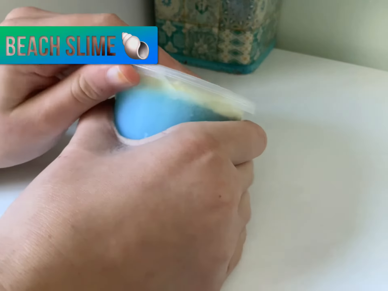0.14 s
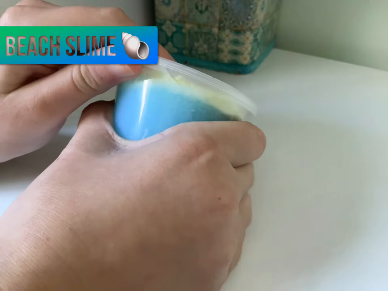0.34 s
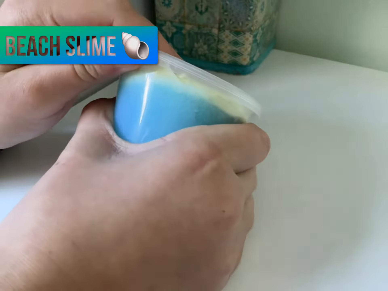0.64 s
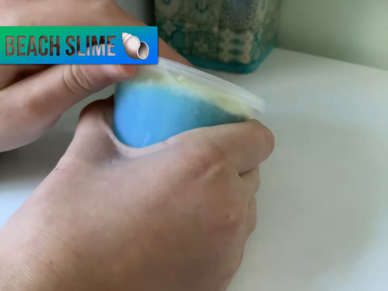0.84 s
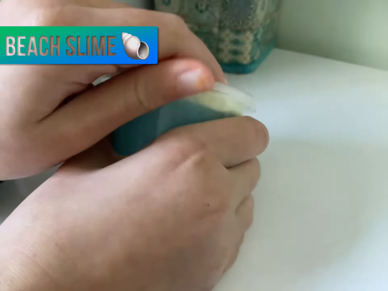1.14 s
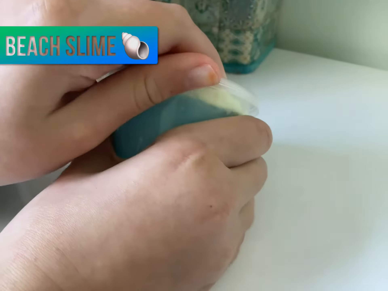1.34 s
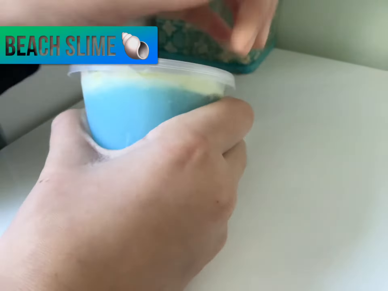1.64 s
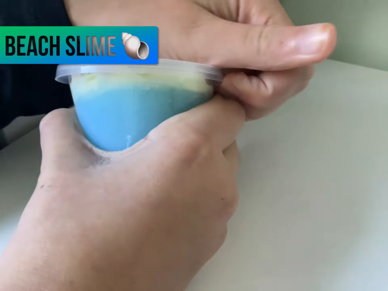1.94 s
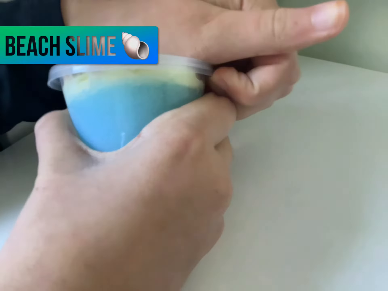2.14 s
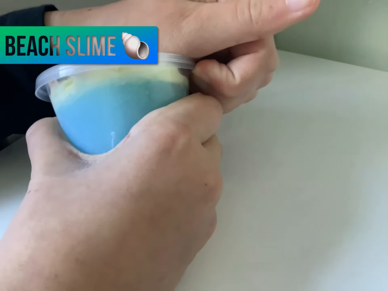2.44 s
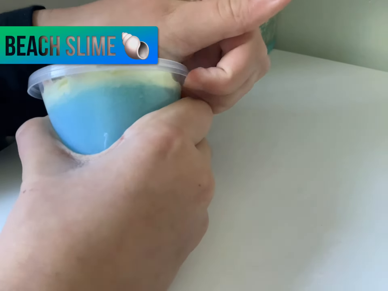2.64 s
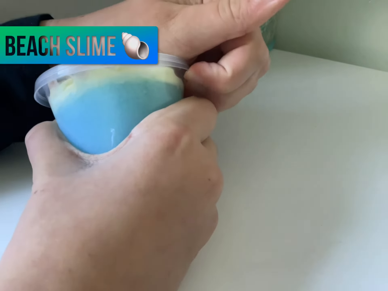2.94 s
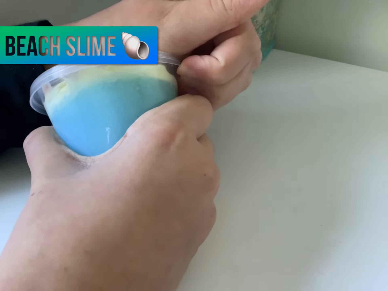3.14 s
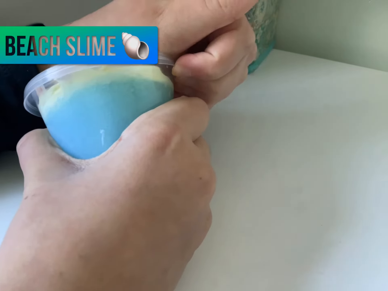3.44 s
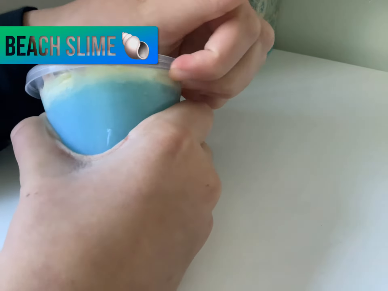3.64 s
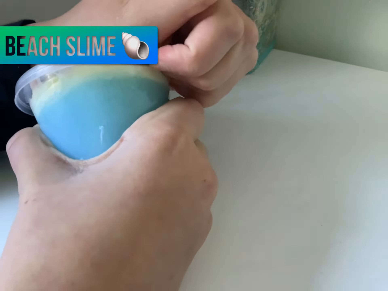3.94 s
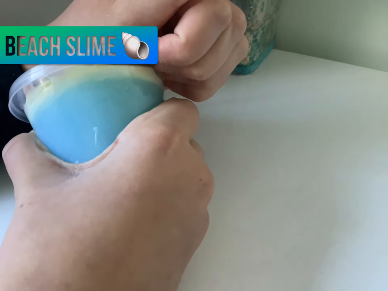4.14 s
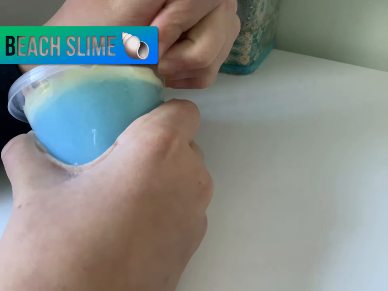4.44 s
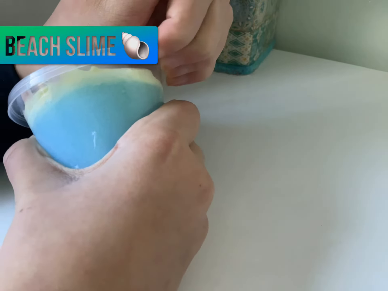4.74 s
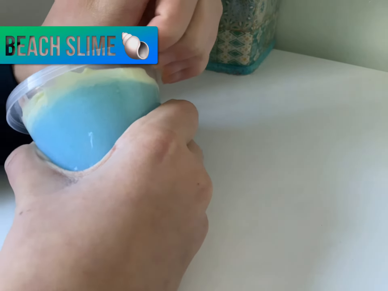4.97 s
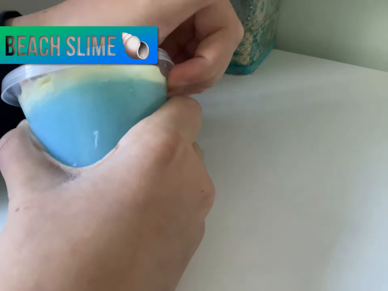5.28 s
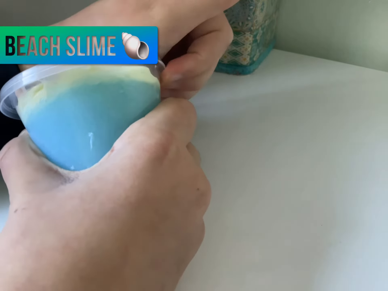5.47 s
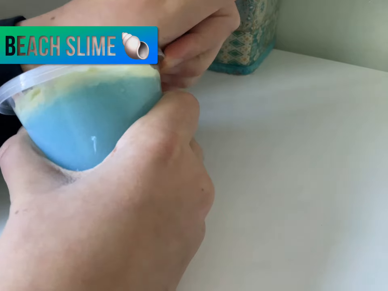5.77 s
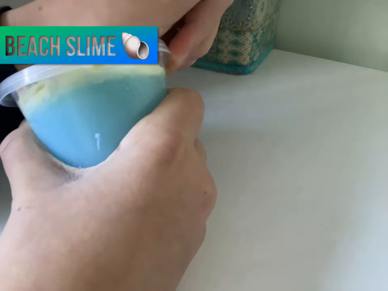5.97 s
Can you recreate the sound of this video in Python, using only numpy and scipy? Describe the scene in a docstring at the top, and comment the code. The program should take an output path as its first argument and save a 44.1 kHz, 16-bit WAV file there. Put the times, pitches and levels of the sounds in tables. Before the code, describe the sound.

Sharp plastic snaps and fine ratcheting ticks as fingers pry a thin lid off a small tub, one hollow pop as the seal gives.

```python
"""Prying a thin plastic lid off a tub of slime

Fingers pry the lid close to the microphone in a quiet room. The rim sticks and slips over the tub's lip
in runs of ticks and snaps free piece by piece: impulses that ring the tub's modes and a diffuse room.
The seal lets go with one pop, a damped swing of air whose pitch falls. Fingertips tap the lid as softer
impulses and rub it as grainy filtered noise; wavering sines and coloured noise make a low hum and hiss."""
import sys
import numpy as np
from scipy import signal
from scipy.fft import rfft, irfft, next_fast_len
from scipy.io import wavfile
from scipy.ndimage import uniform_filter1d, map_coordinates

SR = 44100
rng = np.random.default_rng(int(sys.argv[2]) if len(sys.argv) > 2 else 0)


def to_wav(s):
    """Save 16-bit WAV."""
    ch = np.atleast_2d(s).T  # columns
    pcm = np.round(np.clip(ch, -1, 1) * 32767)  # PCM
    wavfile.write(sys.argv[1], SR, pcm.astype(np.int16))


N = 269451
AJAR_S = 4.5  # from this time the lid counts as lifted at one side


def amp(db):
    """Decibel law: the amplitude ratio of a level."""
    return 10 ** (np.asarray(db) / 20)


def unit(x):
    """Normalisation to an rms of 1."""
    return x / np.sqrt(np.mean(x ** 2) + 1e-20)


def along(points, hz):
    """Interpolation of (frequency [Hz], value) points on a logarithmic frequency axis."""
    point_hz, values = np.transpose(points)
    return np.interp(np.log(hz + 1), np.log(point_hz), values)


def clock(size):
    """Uniform sampling: the times [s] of size samples."""
    return np.arange(size) / SR


def wobble(rate):
    """Band-limited fluctuation: a smooth curve through random knots, rate of them a second."""
    knots = rng.standard_normal(int(N * rate / SR) + 4)
    return map_coordinates(knots, [clock(N) * rate])


def filtered(x, response):
    """Linear filtering: the spectrum of x times a complex response of frequency."""
    size = next_fast_len(2 * len(x))
    hz = np.fft.rfftfreq(size, 1 / SR)
    return irfft(rfft(x, size) * response(hz), size)[:len(x)]


def noise(spectrum):
    """Spectral shaping: white noise coloured by a spectrum, with an rms of 1."""
    return unit(filtered(rng.standard_normal(N), lambda hz: amp(along(spectrum, hz))))


def add(track, s, sound):
    """Superposition: mix a sound into the track at s seconds."""
    part = track[round(s * SR):][:len(sound)]
    part += sound[:len(part)]


# spectrum of the room air: (frequency [Hz], relative density [dB per Hz])
AIR_SPECTRUM = [(25, -40), (42, -10.5), (90, -4.5), (150, -17), (373, -17.5), (610, -23.5), (1070, -25.5),
                (4400, -26.5), (6500, -30), (8800, -34), (11500, -26), (15700, -26.5), (16300, -52.5)]
# partials of the low hum: (frequency [Hz], mean rms level [dB])
HUM_PARTIALS = [(91.5, -72), (183.5, -79.5), (370, -82)]


def background():
    """Stationary noise and slow modulation: room air, and a low hum that wavers in pitch and level."""
    phase = 2 * np.pi * (clock(N) + 0.0021 * wobble(3.8))
    hum = np.zeros(N)
    for hz, db in HUM_PARTIALS:
        hum += amp(db + 1.2 * wobble(17)) * np.sqrt(2) * np.sin(hz * phase)
    air_db = -64.8 + 0.8 * wobble(0.7)
    return hum + amp(air_db) * noise(AIR_SPECTRUM)


def resonance(hz, centre_hz, width_hz):
    """Damped oscillator: the response of one mode, of gain 1 at its centre."""
    return 1j * hz * width_hz / (centre_hz ** 2 - hz ** 2 + 1j * hz * width_hz)


# each table of modes: (centre [Hz], width [Hz], gain [dB]); each push detunes the centres slightly
# the plastic
PLASTIC_MODES = [(1034, 100, 1.5), (1410, 280, -2), (1763, 110, 1), (2197, 166, -2), (2580, 140, -2.5),
                 (3180, 600, -5), (4446, 850, -2), (5774, 786, 3.5), (7100, 1200, 0.5), (9220, 1400, -11),
                 (10770, 1570, 2.5), (11800, 3740, 0.5), (14840, 1950, -3.5)]
# the air in the tub under the closed lid
CLOSED_MODES = [(248, 820, -6.5), (501, 139, 5)]
# the air in the tub and the loose flap of rim, once the lid has lifted at one side
AJAR_MODES = [(403, 280, -5), (685, 75, 10), (3510, 260, -1), (4670, 480, 6)]


def tub(hz, s):
    """Modal superposition: the tub's response to a push at s seconds; the grip retunes it each time."""
    modes = (AJAR_MODES if s > AJAR_S else CLOSED_MODES) + PLASTIC_MODES
    bend = np.exp(0.027 * rng.standard_normal(len(modes)))
    response = 0
    for k, (centre_hz, width_hz, db) in enumerate(modes):
        sign = (-1) ** k  # successive modes in the tables alternate in sign
        response = response + sign * amp(db) * resonance(hz, centre_hz * bend[k], width_hz)
    return response


# decay of the room: (frequency [Hz], time to fall by 60 dB [s])
ROOM_DECAY = [(200, 0.388), (1500, 0.33), (3300, 0.35), (4700, 0.3), (7500, 0.43), (11000, 0.36),
              (16000, 0.24)]
# colour of the room's answer: (frequency [Hz], relative level [dB])
ROOM_TINT = [(150, 9.5), (600, 0.5), (2000, 2), (4500, 0.5), (8000, -4), (11500, -4.5), (15600, -4.5),
             (16400, -24.5)]


def in_room(sound, room_db, size=512):
    """Diffuse reverberation: the walls gather all directions, so only the sound's broad colour survives."""
    hz, t, grains = signal.stft(rng.standard_normal(SR // 2), SR, nperseg=size)
    power = np.sum(np.abs(signal.stft(sound, nperseg=size)[2]) ** 2, axis=1)
    colour = np.sqrt(np.abs(uniform_filter1d(power, size=3)))
    fade = amp(along(ROOM_TINT, hz)[:, None] - 60 * t / along(ROOM_DECAY, hz)[:, None])
    tail = signal.istft(grains * colour[:, None] * fade, SR, nperseg=size)[1]
    tail = tail * (1 - np.exp(-(clock(len(tail)) / 0.00073) ** 2))  # the walls take a moment to answer
    tail = filtered(tail, lambda f: f ** 2 / (f ** 2 + 170 ** 2))  # so small a source sends out little bass
    # room_db is the energy of the answer against the direct sound
    heard = amp(room_db) * np.linalg.norm(sound) * tail / np.linalg.norm(tail)
    add(heard, 0, sound)
    return heard


# bands of the air in the tub, the flexing lid, the stiff rim and its thin edge: (from [Hz], to [Hz])
PART_BANDS = [(100, 780), (780, 3800), (3800, 8800), (8800, 16500)]


def click(s, levels_db, spot_hz, spot_db, crackle_db, crackle_t60, table_db):
    """Impulse excitation: a sudden release and its micro-slips ring each part of the tub at its own level."""
    t = clock(size=2048)
    crackle = rng.standard_normal(len(t)) * rng.exponential(size=len(t)) * amp(-60 * t / crackle_t60)
    force = amp(crackle_db) * crackle / np.linalg.norm(crackle)
    force[0] += 1
    # the table top throws the click back, scattered by the hands
    late = t - 0.0022
    bounce = rng.standard_normal(len(t)) * (late > 0) * amp(-60 * np.abs(late) / 0.0036)
    force += amp(table_db) * bounce / np.linalg.norm(bounce)

    def response(hz):
        """Local resonance: the spot that is bent or touched favours one frequency."""
        return tub(hz, s) * (1 + amp(spot_db) * resonance(hz, spot_hz, 0.25 * spot_hz))

    ring = filtered(force, response)
    total = np.zeros(len(t))
    for db, band in zip(levels_db, PART_BANDS):
        part = signal.sosfilt(signal.butter(3, band, "bandpass", fs=SR, output="sos"), ring)
        total += amp(db) * part / np.linalg.norm(part)
    return np.sqrt(0.007 * SR) * total  # each level is an rms taken over 7 ms


def arch(values, count):
    """Quadratic interpolation: count steps along an arch through a first, a middle and a last value."""
    return np.polyval(np.polyfit([-1, 0, 1], values, 2), np.linspace(-1, 1, count))


# stick-slip runs of the rim along the lip: (time [s], ticks [count], (first, middle, last gap [s]),
# (first, middle, last rim level [dB]), edge against rim in the first tick [dB])
STICK_SLIP_RUNS = [(3.4604, 6, (0.009, 0.0124, 0.0143), (-43, -36.5, -27), -3),
                   (3.8814, 3, (0.013, 0.0129, 0.0129), (-36, -34.5, -39), -2.5),
                   (3.916, 5, (0.0082, 0.0094, 0.0145), (-36.5, -33.5, -49), 5)]
RUN_BRIGHTENS_DB = 4.5  # the edge gains this much against the rim from the first tick to the last


def run_ticks():
    """Stick-slip friction: (time, level, brightness) of ticks whose pace and force change smoothly."""
    ticks = []
    for s, count, gaps, levels_db, bright_db in STICK_SLIP_RUNS:
        steps = np.exp(arch(np.log(gaps), count - 1))
        times = s + np.cumsum([0, *steps])
        brightness_db = bright_db + np.linspace(0, RUN_BRIGHTENS_DB, count)
        ticks += zip(times, arch(levels_db, count), brightness_db)
    return ticks


# further single slips outside the smooth runs:
# (time [s], rim level [dB], brightness: edge against rim [dB])
SINGLE_SLIPS = [(0.1485, -60, 0.5), (0.2462, -60, 5.5), (1.137, -53, -2), (2.0958, -48, -3),
                (2.1085, -46.5, -7), (2.5497, -43.5, -15), (2.5629, -36.5, 0.5), (2.732, -45.5, 0.5),
                (3.7589, -55, 1), (3.8479, -44, 2.5), (3.9784, -41.5, 9), (5.302, -43.5, -4.5)]
SLIP_TUB_DB, SLIP_LID_DB = -16.5, -6  # air in the tub and lid, against the rim


def slips():
    """Sudden release of friction: each slip is a clean, dry tick that hardly moves the air in the tub."""
    track = np.zeros(N)
    for s, db, bright_db in SINGLE_SLIPS + run_ticks():
        levels_db = db + np.array([SLIP_TUB_DB, SLIP_LID_DB, 0, bright_db])
        tick = click(s, levels_db, spot_hz=1730, spot_db=-13.5,
                     crackle_db=-11.5, crackle_t60=0.006, table_db=-11.5)
        add(track, s, in_room(tick, room_db=-16.5))
    return track


def gulp(db, start_hz, end_hz, glide, attack, t60):
    """Damped air oscillation: a swing whose pitch falls from start_hz towards end_hz."""
    t = clock(size=8192)
    hz = end_hz + (start_hz - end_hz) * np.exp(-t / glide)
    envelope = amp(db - 60 * t / t60) * (1 - np.exp(-t / attack))
    return envelope * np.sin(2 * np.pi * np.cumsum(hz) / SR)


# the rim snaps over the lip: (time [s], edge level [dB], thinness: lid below edge [dB],
# level of the air in the tub [dB], room answer against the direct sound [dB], ring of the bent spot [Hz])
RIM_SNAPS = [(0.4564, -20, 29.5, -55.5, -12.5, 1230), (0.5243, -22, 40, -63, -35, 2560),
             (0.562, -19, 23, -42.5, -14.5, 1100), (0.825, -26, 30.5, -55.5, -19.5, 2400),
             (0.902, -16.5, 22.5, -47.5, -10.5, 2700), (2.5815, -19.5, 11, -40.5, -18, 2400),
             (3.16, -16, 12.5, -31, -16, 2230), (3.5539, -22, -0.5, -38.5, -16, 1555),
             (3.9863, -13.5, 19.5, -37.5, -23, 4640), (3.9888, -27.5, 11, -46, -28, 2200),
             (4.359, -18.5, 7, -33, -13, 1020), (4.4163, -31, 5, -42, -15.5, 2060),
             (5.3635, -19, 11, -32.5, -14.5, 1240)]
SNAP_RIM_SHARE = 0.5  # a thin snap frees only the edge: the rim loses this share of the thinness
PUFF_DB = -16.5  # start level of the puff before its attack and decay, against the air in the tub


def snaps():
    """Release of elastic energy: bursts of tiny releases fill the room; the jolted tub gives a small puff."""
    track = np.zeros(N)
    for s, db, thin_db, tub_db, room_db, spot_hz in RIM_SNAPS:
        levels_db = [tub_db, db - thin_db, db - SNAP_RIM_SHARE * thin_db, db]
        snap = click(s, levels_db, spot_hz, spot_db=4.5, crackle_db=-1.0, crackle_t60=0.016, table_db=-4.5)
        puff = gulp(db=tub_db + PUFF_DB, start_hz=330, end_hz=60, glide=0.01, attack=0.002, t60=0.053)
        add(track, s, in_room(snap, room_db))
        add(track, s, puff)
    return track


# skin rubs over the plastic, levels before the trims in rubs():
# (start of full contact [s], length of full contact [s], body level [dB], hiss level [dB])
SKIN_RUBS = [(1.403, 0.33, -71.5, -58), (1.772, 0.42, -63, -59), (2.516, 0.02, -60, -52.5),
             (3.053, 0.1, -63, -66), (5.143, 0.082, -61.5, -58), (5.231, 0.045, -61.5, -48),
             (5.941, 0.075, -61, -48.5)]
# spectra of the murmur and of the hiss: (frequency [Hz], relative density [dB per Hz])
MURMUR_SPECTRUM = [(140, 1), (300, 15), (500, 11), (1100, 3.5), (1900, 10.5), (3000, -1), (5000, 7.5),
                   (8500, -10), (12000, -25)]
HISS_SPECTRUM = [(5000, -22.5), (9000, -12.5), (11500, -3.5), (13500, -4), (15600, -5), (16200, -15.5)]
RUB_ATTACK_S, RUB_RELEASE_S = 0.079, 0.034


def rubs():
    """Sliding friction: skin drags in small catches, a grainy murmur of the lid under a fine hiss."""
    t, body, hiss = clock(N), np.zeros(N), np.zeros(N)
    for s, length, body_db, hiss_db in SKIN_RUBS:
        corners = [s - RUB_ATTACK_S, s, s + length, s + length + RUB_RELEASE_S]
        contact = np.interp(t, corners, [0, 1, 1, 0])
        body += contact * amp(body_db)
        hiss += contact * amp(hiss_db)
    # about 70 catches a second, each dying away over a steady drag
    catches = (rng.random(N) < 70 / SR) * rng.uniform(0.21, 1, N)
    grip = unit(0.83 + signal.fftconvolve(catches, amp(-60 * clock(size=1024) / 0.017))[:N])
    murmur = amp(-3.5) * body * grip * noise(MURMUR_SPECTRUM)
    return murmur + amp(-10.5) * hiss * noise(HISS_SPECTRUM)


# fingers feel for the loosened rim: (from [s], to [s])
FUMBLE_SPANS = [(5.099, 5.18), (5.58, 5.62), (5.9, 6.02)]
TOUCHES_PER_S, TOUCH_DB, TOUCH_SPREAD_DB, TOUCH_HARDNESS_DB = 40, -60, 3.5, -26


def touches():
    """Jittered point process: (time, level, hardness) of faint touches loosely spaced in each fumble."""
    spans = [np.arange(start, end, 1 / TOUCHES_PER_S) for start, end in FUMBLE_SPANS]
    found = []
    for s in np.concatenate(spans):
        late, force = rng.uniform(-1, 1, 2)
        time = s + 0.5 * late / TOUCHES_PER_S
        found.append((time, TOUCH_DB + TOUCH_SPREAD_DB * force, TOUCH_HARDNESS_DB))
    return found


# fingertips and nails touch the lid: (time [s], lid level [dB], hardness: edge against lid [dB])
FINGER_TAPS = [(1.513, -49.5, -2), (1.5196, -52, -0.5), (1.526, -53.5, -5), (1.8757, -35.5, -11.5),
               (2.1563, -58, -6), (2.2045, -55.5, -15), (2.5193, -45.5, -20), (5.1834, -45, -6),
               (5.1925, -35.5, -4.5), (5.631, -48, -11), (5.6604, -55, -10), (5.6854, -51.5, -12),
               (5.9279, -49.5, -1.5), (5.9671, -46.5, -4), (6.0447, -56, -22)]
TAP_TUB_DB, TAP_RIM_DB = -8, -3  # against the lid
TAP_RIM_SHARE = 0.41  # the rim takes this share of the hardness
TAUT_LID_HZ, LOOSE_LID_HZ = 2100, 1128  # what a touch rings while the lid is closed, and once it is ajar


def taps():
    """Contact stiffness: soft fingers knock the middle of the lid; a nail also reaches the rim and edge."""
    track = np.zeros(N)
    for s, db, hard_db in FINGER_TAPS + touches():
        levels_db = db + np.array([TAP_TUB_DB, 0, TAP_RIM_DB + TAP_RIM_SHARE * hard_db, hard_db])
        spot_hz = LOOSE_LID_HZ if s > AJAR_S else TAUT_LID_HZ
        knock = click(s, levels_db, spot_hz, spot_db=8, crackle_db=6, crackle_t60=0.0027, table_db=-1.0)
        add(track, s, in_room(knock, room_db=-13.0))
    return track


# faint narrow bands of noise that swell and fade: (time [s], centre [Hz], width of the filter,
# which is applied twice [Hz], rms level at the top of the swell [dB], time to the top [s])
FAINT_BANDS = [(3.157, 4420, 850, -51, 0.036), (3.991, 4960, 800, -62, 0.068), (4.39, 2088, 60, -61, 0.039),
               (4.42, 2494, 34.6, -69, 0.072), (4.46, 1390, 40, -73.5, 0.063),
               (4.52, 3235, 30, -67.5, 0.073)]


def faint_bands():
    """Narrow-band filtering: each band of noise is a fluttering tone that swells quickly and fades slowly."""
    track, t = np.zeros(N), clock(size=SR)
    for s, centre_hz, width_hz, db, rise in FAINT_BANDS:
        tone = filtered(rng.standard_normal(SR), lambda hz: resonance(hz, centre_hz, width_hz) ** 2)
        swell = t / rise * np.exp(1 - t / rise)
        add(track, s, amp(db) * unit(tone) * swell)
    return track


def pop():
    """Cavity release: the seal breaks with a hollow plop, then the low puff of air that it lets out."""
    track = np.zeros(N)
    plop = -gulp(db=-5.5, start_hz=465, end_hz=285, glide=0.0019, attack=0.000426, t60=0.013)
    puff = gulp(db=-14.5, start_hz=135.8, end_hz=47.4, glide=0.01, attack=0.0012, t60=0.074)
    add(track, 3.9903, plop)
    add(track, 3.9939, puff)
    return track


def scene():
    """Superposition: the sounds of the tub and the faint bands, over the quiet room."""
    return (background() + slips() + snaps() + rubs() + taps() + faint_bands() + pop())[None]


TOP_HZ = 16750  # upper band limit


def record(dry):
    """Saturation and band limiting: the highest peaks are rounded off and the extreme treble is cut."""
    rounded = dry[0] / (1 + np.abs(dry[0] / 0.95) ** 6) ** (1 / 6)
    return filtered(rounded, lambda hz: 1 / (1 + (hz / TOP_HZ) ** 120))[None]


dry = scene()
out = record(dry)
to_wav(out)
```